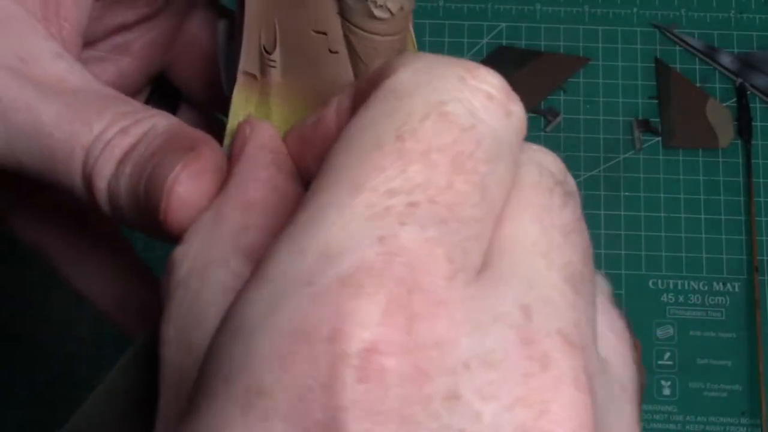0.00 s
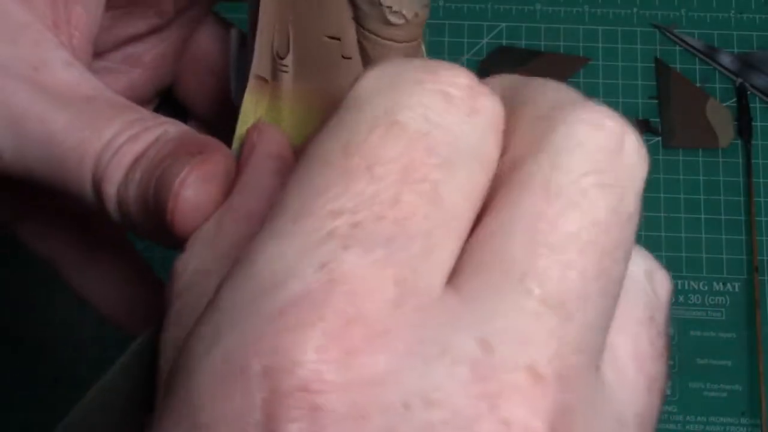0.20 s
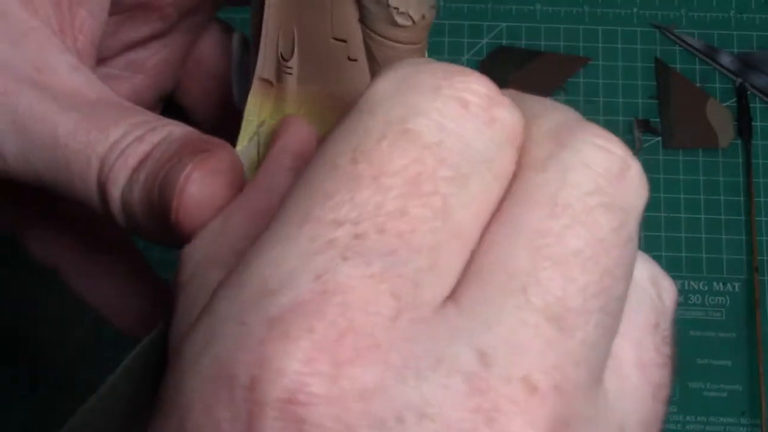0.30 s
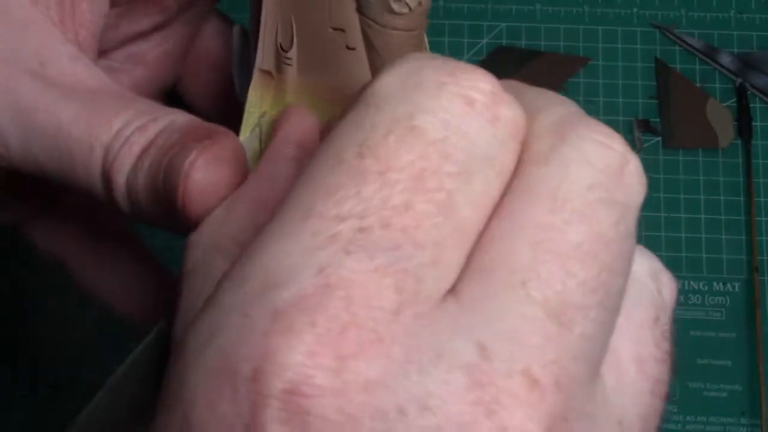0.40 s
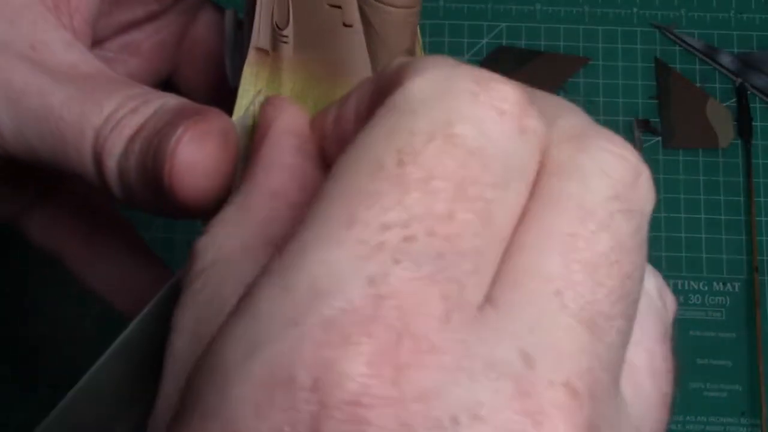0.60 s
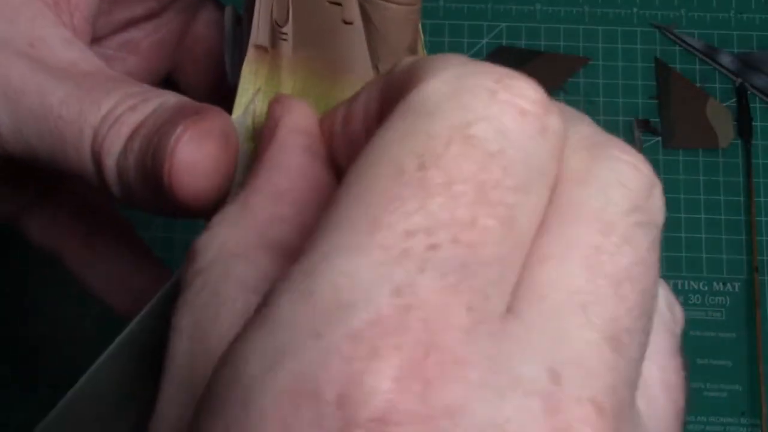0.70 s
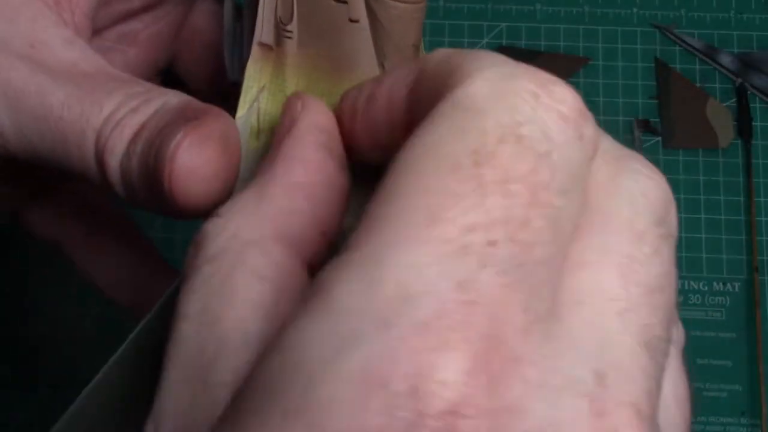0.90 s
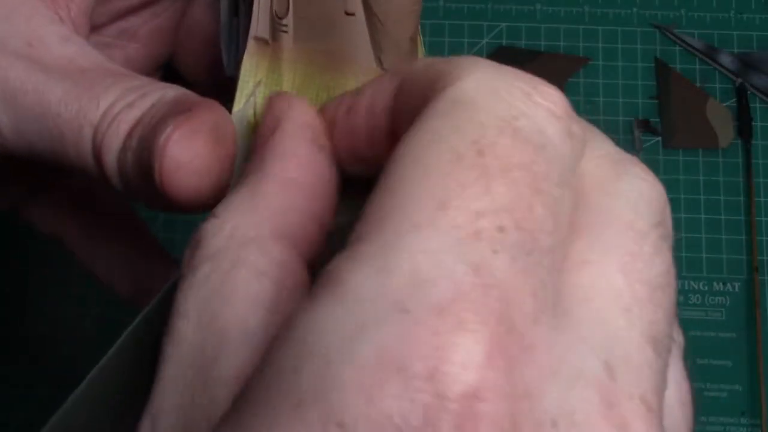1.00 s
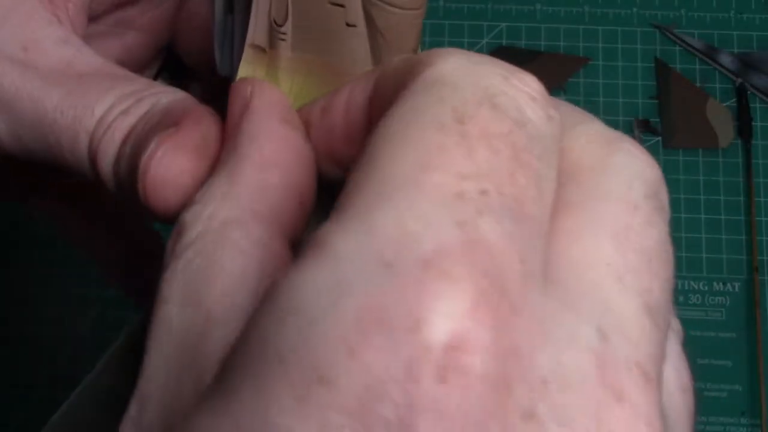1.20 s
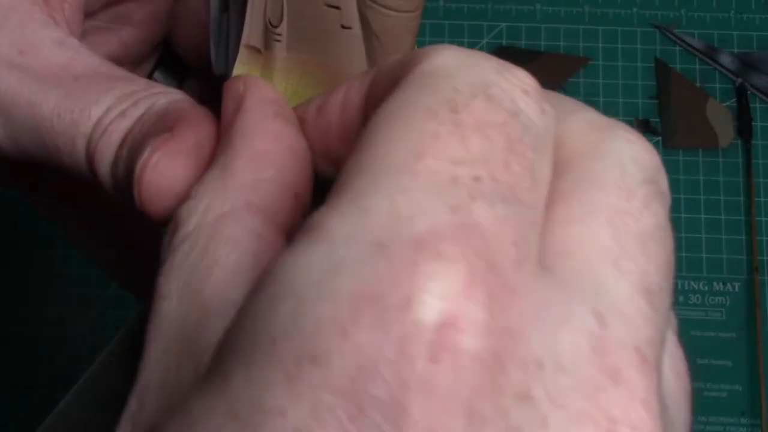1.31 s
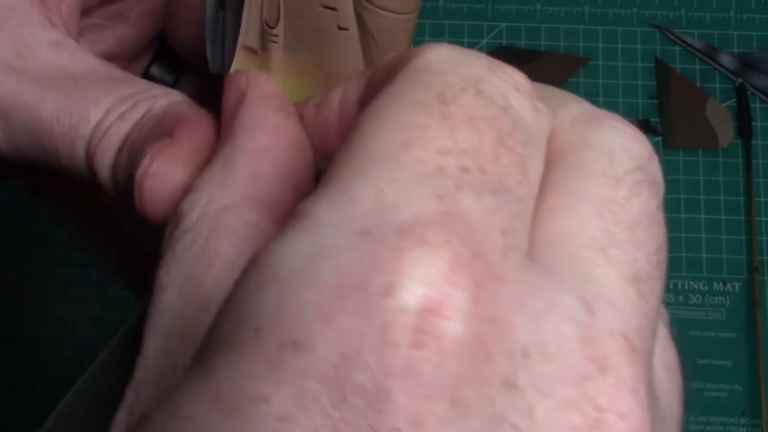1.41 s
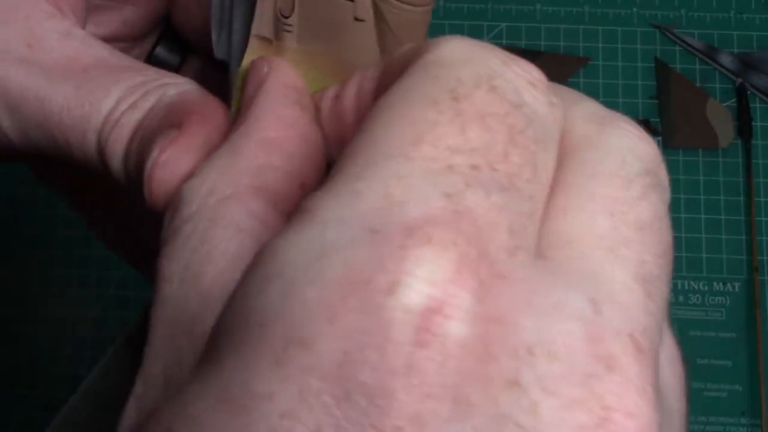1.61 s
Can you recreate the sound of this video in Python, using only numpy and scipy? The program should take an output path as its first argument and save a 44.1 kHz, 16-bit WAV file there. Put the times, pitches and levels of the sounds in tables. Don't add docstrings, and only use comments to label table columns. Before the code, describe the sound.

A hard hollow plastic snap at 0.25 s, by far the loudest sound, rings briefly and shakes the bench. Before it, a nail knocks softly at 0.03 s and scrapes from 0.1 s with tape ticks. Afterwards come sparse sticky ticks around 0.45 and 0.84 s, faint rubbing near 0.9-1.1 s, a papery slide at 1.2 s and light knocks around 1.5 s. Close, quiet small room.

```python
import sys
import numpy as np
from scipy import signal
from scipy.fft import rfft, irfft
from scipy.io import wavfile
from scipy.ndimage import uniform_filter1d

SR = 44100
rng = np.random.default_rng(int(sys.argv[2]) if len(sys.argv) > 2 else 0)


def magnitude_from_level(level_db):
    exponent = np.asarray(level_db, float) / 20
    return 10 ** exponent


def digitize_waveform(pressure):
    field = np.atleast_2d(pressure).T
    bounded = np.clip(field, -1, 1)
    quanta = np.round(bounded * 32767).astype(np.int16)
    wavfile.write(sys.argv[1], SR, quanta)


N = 72765
FREE_S = 0.0046
SLIPS_PER_S, SLIP_SPREAD_DB = 9000, 3.5


def read(points, hz):
    f, value = np.transpose(points)
    return np.interp(np.log(hz + 1), np.log(f + 1), value)


def near(f, hz, octaves):
    return -6 * (np.log2(f / hz) / octaves) ** 2


def evened(x):
    return x / np.sqrt(np.mean(x ** 2) + 1e-20)


def add(mix, start_s, sound):
    part = mix[round(start_s * SR):][:len(sound)]
    part += sound[:len(part)]


def coloured(x, db_of):
    hz = np.fft.rfftfreq(len(x), 1 / SR) + 1
    return irfft(rfft(x) * magnitude_from_level(db_of(hz)), len(x))


def slips(per_s, spread_db, size):
    chance, side, strength = rng.random((size, 3)).T
    happens = chance < per_s / SR
    return happens * np.sign(side - 0.5) * magnitude_from_level(-spread_db * np.log(strength + 0.02))


# pitch_hz [Hz], level_db [dB per Hz]
HUSH = [(25, -14), (60, -6), (185, -5), (330, -2), (607, -6), (1790, -13.5), (8000, -27), (16000, -34)]
# pitch_hz [Hz], likeness [0-1]
HUSH_SAME = [(30, 0.47), (150, 0.78), (500, 0.82), (2000, 0.66), (12000, 0.82)]


def hush():
    level_db, patch_db = -61.5, 1.5
    frames, hz = N // 256 + 5, np.fft.rfftfreq(1024, 1 / SR)
    a, b, c, d, patches = rng.standard_normal((frames, 513, 5)).T
    patches = uniform_filter1d(patches, size=14, axis=0)
    patches = evened(uniform_filter1d(patches, size=10, axis=1))
    same = read(HUSH_SAME, hz)[:, None]
    mid = np.sqrt(1 + same) * (a + 1j * b)
    side = np.sqrt(1 - same) * (c + 1j * d)
    z = np.array([mid + side, mid - side]) * magnitude_from_level(read(HUSH, hz)[:, None] + patch_db * patches)
    return magnitude_from_level(level_db) * evened(signal.istft(z, nperseg=1024, noverlap=768)[1][:, :N])


# pitch_hz [Hz], t60_s [s]
ROOM_T60 = [(200, 0.29), (600, 0.37), (1200, 0.59), (2000, 0.48), (4500, 0.57), (9000, 0.23),
            (15000, 0.061)]
# pitch_hz [Hz], level_db [dB]
ROOM_TONE = [(200, 7.5), (900, 12.5), (2000, -5), (5000, 7.5), (12000, 18.5)]


def room(x):
    same, spacing = 0.95, 20
    taps = np.zeros((2, SR // 2))
    at = np.arange(200, SR // 2 - spacing, spacing)
    at = at + rng.integers(0, spacing, (2, len(at)))
    np.put_along_axis(taps, at, rng.choice([-1., 1.], at.shape), 1)
    taps = np.sqrt(1 + same) * taps[0] + np.sqrt(1 - same) * taps[1] * np.array([[1], [-1]])
    hz, t, z = signal.stft(taps, SR, nperseg=256)
    decay_db = read(ROOM_TONE, hz)[:, None] - 60 * t / read(ROOM_T60, hz)[:, None]
    tail = signal.istft(z * magnitude_from_level(decay_db), SR, nperseg=256)[1]
    return signal.fftconvolve(x[None], tail / np.linalg.norm(tail[0]), axes=1)[:, :N]


# pitch_hz [Hz], level_db [dB]
BENCH = [(500, -13), (800, 5.5), (1300, 3.5), (2000, -3), (3000, -5), (4300, -18), (6500, -18.5),
         (12000, -42.5), (14000, -52)]
# pitch_hz [Hz], t60_s [s]
BENCH_T60 = [(500, 0.092), (1500, 0.17), (4500, 0.39), (10000, 0.43)]


def bench():
    level_db, side_gain = -37, 0.13
    hz, t, z = signal.stft(rng.standard_normal((2, SR // 2)), SR, nperseg=256)
    decay_db = read(BENCH, hz)[:, None] - 60 * t / read(BENCH_T60, hz)[:, None]
    wash = signal.istft(z * magnitude_from_level(decay_db), SR, nperseg=256)[1]
    rise = np.minimum(np.arange(wash.shape[1]) / SR / FREE_S, 1)
    wash *= magnitude_from_level(level_db) / np.std(wash[0, :1000]) * rise
    out = np.zeros((N, 2))
    add(out, SNAP[0][0], (wash[0] + side_gain * wash[1] * np.array([[1], [-1]])).T)
    return out.T


# start_s [s], rise_s [s], t60_s [s], level_db [dB], pitch_hz [Hz]
SLIDES = [
    (0.123, 0.044, 0.05, -54, 7700),
    (0.682, 0.014, 0.22, -66.5, 3020),
    (0.738, 0.0069, 0.33, -68.5, 7300),
    (0.933, .05, 1, -77, 6150),
    (1.2, 0.011, 0.42, -54, 5000),
    (1.504, 0.022, 0.067, -77, 5470),
]


def slides():
    grains_per_s, spread_db, width_octaves, air_hz = 5000, 2.5, 0.6, 12000
    out, t = np.zeros(N), np.arange(16384) / SR
    for start_s, rise_s, t60_s, level_db, pitch_hz in SLIDES:
        grains = slips(grains_per_s, spread_db, len(t))
        rub = coloured(grains, lambda f: near(f, pitch_hz, width_octaves) - 3 * (f / air_hz) ** 4)
        decay_db = level_db - 60 * np.maximum(t - rise_s, 0) / t60_s
        add(out, start_s, evened(rub) * np.minimum(t / rise_s, 1) * magnitude_from_level(decay_db))
    return out


# start_s [s], length_s [s], level_db [dB], pitch_hz [Hz], width_octaves [octaves]
RUBS = [(0.094, 0.034, -46.5, 2050, 0.097), (.104, 0.039, -45.5, 2560, 0.12), (.108, 0.042, -57, 805, 0.19),
        (0.116, 0.029, -48.5, 1290, 0.058), (0.899, 0.19, -69.5, 2490, 0.47),
        (0.93, 0.15, -66.5, 3250, .15), (.935, 0.16, -66.5, 1863, 0.056), (1.203, 0.04, -64, 2640, 0.38),
        (1.405, 0.024, -63, 2220, .17), (1.507, 0.036, -56.5, 529.2, 0.16),
        (1.508, 0.038, -52.5, 1667, 0.19)]


def rubs():
    out, t = np.zeros(N), np.arange(16384) / SR
    for start_s, length_s, level_db, pitch_hz, width_octaves in RUBS:
        grains = slips(SLIPS_PER_S, SLIP_SPREAD_DB, len(t))
        rub = coloured(grains, lambda f: np.maximum(near(f, pitch_hz, width_octaves), -60))
        swell = np.sqrt(abs(np.sin(np.pi * np.minimum(t / length_s, 1))))
        add(out, start_s, evened(rub) * magnitude_from_level(level_db) * swell)
    return out


# start_s [s], peak_db [dB], pitch_hz [Hz], width_octaves [octaves]
TICKS = [(0.0329, -41.5, 4450, 0.4), (0.1185, -39, 3600, 0.38), (0.132, -51, 2600, .9),
         (0.1572, -36, 6440, 0.277), (0.156, -55, 3820, 0.21), (.1645, -45, 5000, 0.4),
         (0.4447, -45, 4730, 0.43), (0.4463, -52, 11000, 0.25), (0.458, -47.5, 4740, 0.29),
         (0.4585, -53, 12400, 0.77), (0.501, -66, 5370, .2), (0.5655, -67.5, 4900, 0.8),
         (0.568, -53, 6000, 0.7), (.652, -85, 5800, 0.15), (0.8411, -46.5, 3060, 0.23),
         (0.987, -54.5, 13320, 0.23), (1.047, -57, 3150, 0.2), (1.06, -45.5, 4050, 0.64),
         (1.179, -55, 3800, 0.49), (1.185, -40.5, 4170, 0.92), (1.187, -57, 14000, 0.18),
         (1.21, -53, 4800, .5), (1.443, -55, 4200, 0.69), (1.48, -48.5, 3900, 0.44),
         (1.48, -53.5, 8800, .5), (1.5185, -63, 6000, .9), (1.531, -57.5, 6000, .8),
         (1.642, -63.5, 5200, .2)]


def ticks():
    t60_s, rise_s, air_hz, flutter_s, flutter_gain = 0.0056, 0.00042, 14900, 0.00095, 0.4
    out, t = np.zeros(N), np.arange(2048) / SR
    feedback = np.r_[1, np.zeros(round(flutter_s * SR) - 1), -flutter_gain]
    for start_s, peak_db, pitch_hz, width_octaves in TICKS:
        noise = rng.standard_normal(len(t))
        tick = coloured(noise, lambda f: near(f, pitch_hz, width_octaves) - 3 * (f / air_hz) ** 4)
        tick = tick * magnitude_from_level(-60 * t / t60_s) * (1 - np.exp(-t / rise_s))
        tick = signal.lfilter([1], feedback, tick)
        add(out, start_s, magnitude_from_level(peak_db) * tick / abs(tick).max())
    return out


# start_s [s], level_db [dB], bright_db [dB], contact_hz [Hz]
SCRAPE = [(0, -46, -29, 1850), (0.092, -47, -14.5, 2380), (0.102, -45.5, -8, 2330),
          (.125, -37, -16.5, 2330), (0.133, -36.5, -6.5, 1580), (0.145, -39.5, -8.5, 1600),
          (0.152, -52, 4, 2440), (0.209, -59.5, -13.5, 2240), (.87, -65.5, -8, 1680),
          (.89, -57.5, -14, 1820), (.95, -56.5, -12, 1600), (1.06, -55, -14, 1880), (1.1, -70, -3, 1720),
          (1.432, -87, -5, 2400), (1.45, -62.5, -2.5, 2370), (1.506, -64.5, -16, 1600),
          (1.527, -51.5, -12.5, 1370), (1.573, -73.5, -4, 1490)]
# pitch_hz [Hz], width_hz [Hz], level_db [dB]
SCRAPE_BODY = [(540, 68, -2), (1080, 180, -9), (1290, 170, -4), (1600, 170, -16), (2050, 220, -10),
               (2537, 86, -6), (3220, 40, -17), (3800, 67, -19), (4600, 120, -20), (6400, 300, -13)]
# pitch_hz [Hz], level_db [dB]
GRIT = [(600, -44), (1500, -11.5), (4000, -12), (8000, -22), (14000, -40.5)]


def scrape():
    low_cut_hz, widen, wander, wander_s = 350, 0.6, 0.015, 0.03
    now = np.arange(N) / SR
    start_s, *controls = np.transpose(SCRAPE)
    level_db, bright_db, contact_hz = (np.interp(now, start_s, c) for c in controls)
    clicks = slips(SLIPS_PER_S, SLIP_SPREAD_DB, N)
    drive = coloured(clicks, lambda f: -12 * np.log2(1 + (low_cut_hz / f) ** 2))
    smoother = np.poly([np.exp(-1 / (wander_s * SR))] * 2)
    body = 0
    for pitch_hz, width_hz, mode_db in SCRAPE_BODY:
        drift = evened(signal.lfilter([1], smoother, rng.standard_normal(N)))
        turn = np.exp(2j * np.pi * pitch_hz * np.cumsum(1 + wander * drift) / SR)
        pole = np.exp(-np.pi * widen * width_hz / SR)
        rung = turn * signal.lfilter([1], [1, -pole], drive / turn)
        body = body + magnitude_from_level(mode_db + near(pitch_hz, contact_hz, 0.59)) * evened(rung.real)
    grit = evened(coloured(drive, lambda f: read(GRIT, f))) * magnitude_from_level(bright_db)
    return (0.5 * body + grit) * magnitude_from_level(level_db)


# pitch_hz [Hz], level_db [dB], t60_s [s]
SHELL = [(350, -28, 0.076), (490, -23, 0.071), (736.4, -16.5, 0.077), (895.5, -15, 0.094),
         (1204, -6, 0.032), (1295, -12, 0.11), (1546, -6, 0.045), (1918.6, 5, 0.034), (2600, -22, 0.03),
         (2980, -6, 0.026), (3280, -8.5, 0.025), (4050, -18, 0.027), (4128, -7.5, 0.033),
         (5000, -16, 0.022)]
INWARD = (4, 7, 11)
# pitch_hz [Hz], level_db [dB]
CRACK = [(600, -39), (1500, -12), (4000, -7), (6000, -13.5), (9000, -20.5), (14000, -31.5)]


def shell(favour_db, thud_db, crack_db, scatter):
    crack_t60_s, thud_hz, thud_t60_s, rise_s = 0.045, 157.6, 0.056, 0.00056
    grip_db, grip_s = -7, 0.001
    t = np.arange(8000) / SR
    ring = np.zeros(len(t))
    for k, (pitch_hz, level_db, t60_s) in enumerate(SHELL):
        luck, phase = scatter * rng.standard_normal(2)
        sign = -1 if k in INWARD else 1
        decay_db = level_db + favour_db(pitch_hz, level_db) + 2 * luck - 60 * t / t60_s
        ring += sign * magnitude_from_level(decay_db) * np.cos(2 * np.pi * pitch_hz * t + phase)
    crack = coloured(rng.standard_normal(len(t)), lambda f: read(CRACK, f))
    ring += magnitude_from_level(crack_db - 60 * t / crack_t60_s) * evened(crack)
    ring += magnitude_from_level(thud_db - 60 * t / thud_t60_s) * np.sin(2 * np.pi * thud_hz * t)
    grip = magnitude_from_level(grip_db * np.clip((t - FREE_S) / grip_s, 0, 1))
    ring *= (1 - np.exp(-t / rise_s)) * grip
    return ring / abs(ring).max()


# start_s [s], peak_db [dB], pitch_hz [Hz], thud_db [dB]
KNOCKS = [(0.033, -31, 1340, -10), (0.077, -42, 1950, -11), (0.564, -51, 2600, -42),
          (.9868, -43, 1270, -33), (1.146, -50.5, 1830, -15), (1.444, -52, 2080, -13),
          (1.488, -48, 1600, -16), (1.509, -46, 1720, -9), (1.516, -43, 520, -8),
          (1.5214, -40.5, 1510, -7.5), (1.5293, -42.5, 1646, -34), (1.537, -44.5, 1100, -2)]


def knocks():
    out = np.zeros(N)
    for start_s, peak_db, pitch_hz, thud_db in KNOCKS:
        favour_db = lambda hz, mode_db: near(hz, pitch_hz, 0.82) - 0.71 * mode_db
        add(out, start_s, magnitude_from_level(peak_db) * shell(favour_db, thud_db, crack_db=-7.5, scatter=0.44))
    return out


# pitch_hz [Hz], level_db [dB], t60_s [s]
RINGS = [(862, -46.5, 0.19), (1200, -45, 0.14), (1304, -49, 0.15), (1542, -51, 0.41), (1906, -35.5, 0.13),
         (1884, -42.5, 0.29), (1942, -44, 0.52), (2830, -43.5, .25), (3050, -46.5, 0.34), (4420, -59, 0.28),
         (4780, -47, 0.23)]


def rings():
    wobble_s, wobble_depth = 0.0054, 0.87
    out, t = np.zeros(N), np.arange(SR // 2) / SR
    for pitch_hz, level_db, t60_s in RINGS:
        tone = np.sin(2 * np.pi * (pitch_hz * t + rng.random()))
        wobble = evened(uniform_filter1d(rng.standard_normal(len(t)), round(wobble_s * SR)))
        tone *= magnitude_from_level(level_db - 60 * t / t60_s) * (1 + wobble_depth * wobble)
        add(out, SNAP[0][0], tone * np.minimum(t / FREE_S, 1))
    return out


# start_s [s], peak_db [dB]
SNAP = [
    (0.2456, -8),
    (0.2556, -36),
]


def snap():
    out = np.zeros(N)
    for k, (start_s, peak_db) in enumerate(SNAP):
        favour_db = lambda hz, mode_db: k * near(hz, 2900, 0.83)
        blow = shell(favour_db, thud_db=-26.5, crack_db=-12.5, scatter=min(k, 1))
        add(out, start_s, -magnitude_from_level(peak_db) * blow)
    return out


def scene():
    pan_db, room_db = 0.52, -13
    hands = slides() + rubs() + ticks() + scrape() + knocks() + rings() + snap()
    direct = hands * magnitude_from_level(np.array([[pan_db], [-pan_db]]))
    return direct + magnitude_from_level(room_db) * room(hands) + bench() + hush()


# pitch_hz [Hz], level_db [dB]
DROP = [(10500, -128), (12500, -112), (14000, -107), (15300, -102), (16000, -70)]


def thinned(x):
    scatter_db = 5
    hz, t, z = signal.stft(x, SR, nperseg=2048, noverlap=1536)
    band_hz = hz[16:1024:32, None]
    power = (abs(z[:, :1024]) ** 2).mean(0).reshape(32, 32, -1).mean(1)
    over_db = 10 * np.log10(power + 1e-20) - read(DROP, band_hz)
    luck = np.repeat(rng.standard_normal((len(t) // 3 + 1, 32)), 3, axis=0)[:len(t)].T
    keep = np.clip(over_db + scatter_db * luck, 0, 1) + (band_hz < DROP[0][0])
    keep = np.repeat(np.minimum(keep, 1), 32, axis=0)
    z = z * np.vstack([keep, keep[-1:]])
    return signal.istft(z, SR, nperseg=2048, noverlap=1536)[1][:, :N]


def roll_off(x):
    return signal.sosfilt(signal.butter(12, 16150, fs=SR, output="sos"), x)


def record(dry):
    low_cut_hz, edge_hz = 148, 16100
    x = signal.sosfilt(signal.butter(1, low_cut_hz, "high", fs=SR, output="sos"), dry)
    band_limit = signal.firwin(511, edge_hz, window=("kaiser", 9), fs=SR)
    x = signal.oaconvolve(x, band_limit[None], "same")
    return roll_off(thinned(x))


dry = scene()
out = record(dry)
digitize_waveform(out)
```